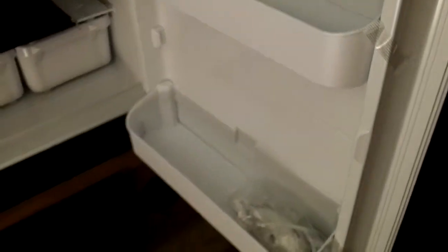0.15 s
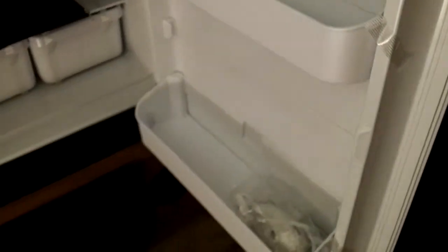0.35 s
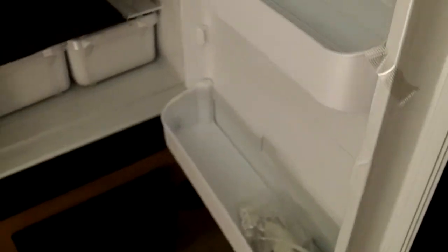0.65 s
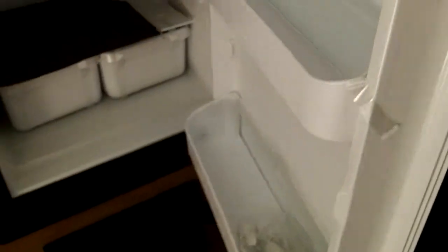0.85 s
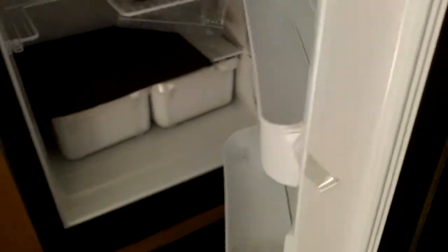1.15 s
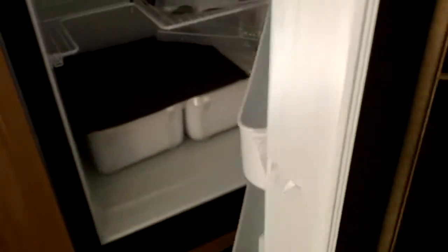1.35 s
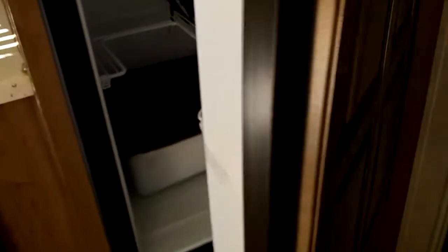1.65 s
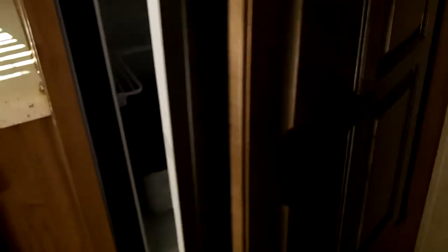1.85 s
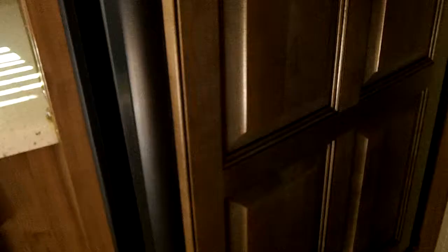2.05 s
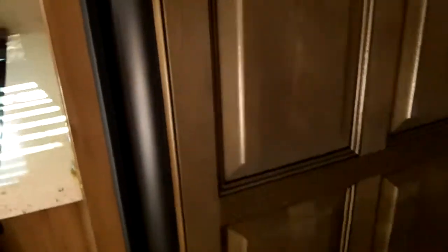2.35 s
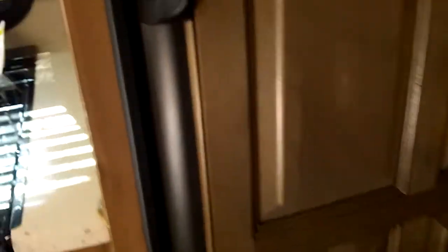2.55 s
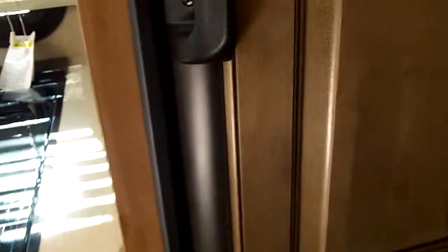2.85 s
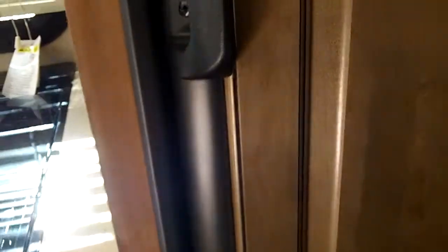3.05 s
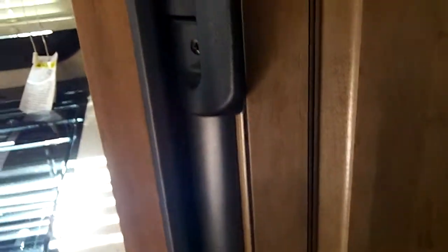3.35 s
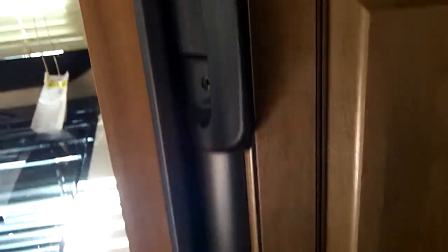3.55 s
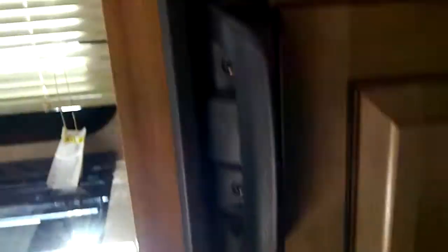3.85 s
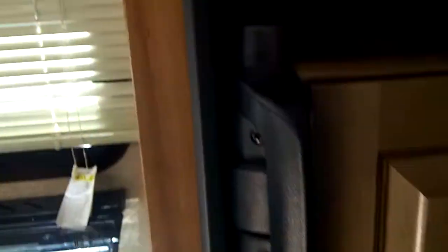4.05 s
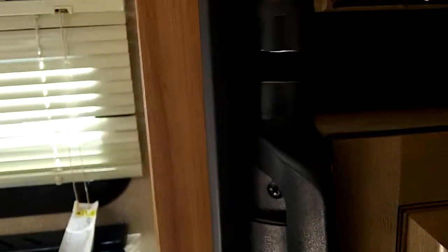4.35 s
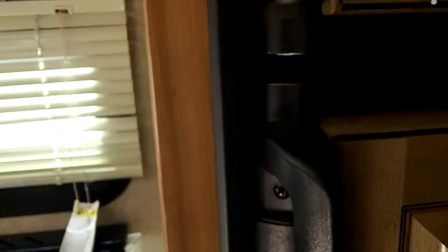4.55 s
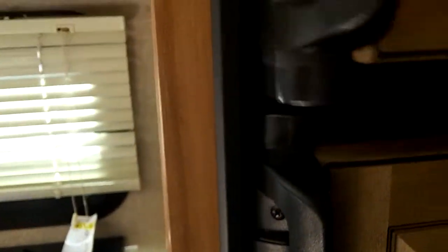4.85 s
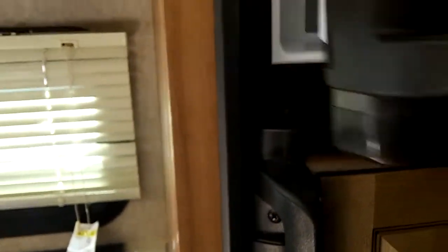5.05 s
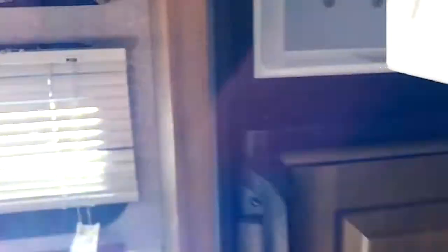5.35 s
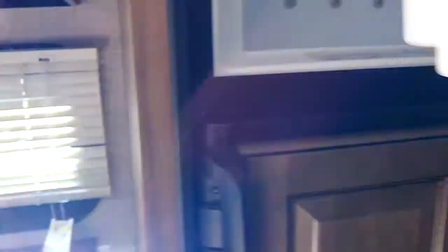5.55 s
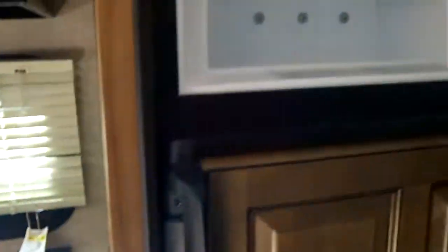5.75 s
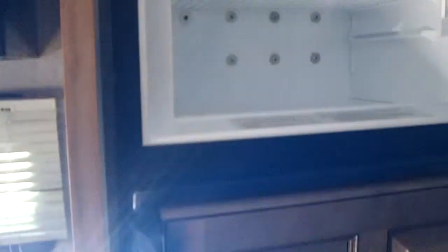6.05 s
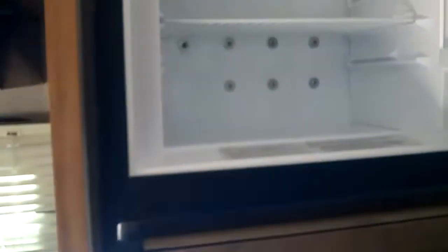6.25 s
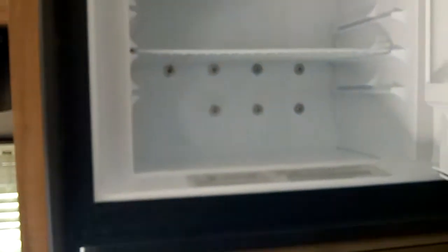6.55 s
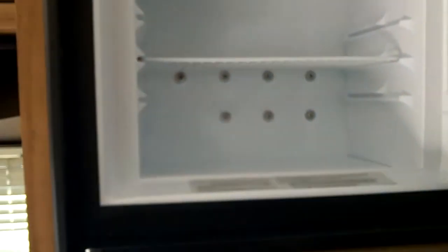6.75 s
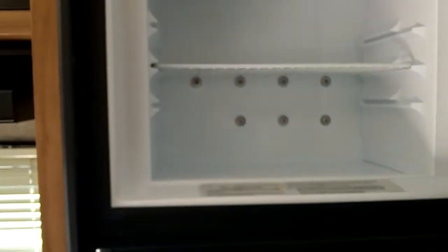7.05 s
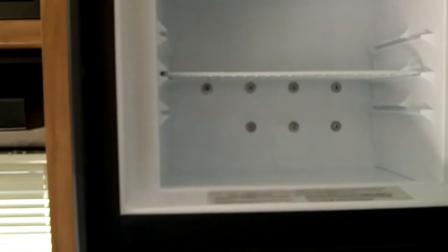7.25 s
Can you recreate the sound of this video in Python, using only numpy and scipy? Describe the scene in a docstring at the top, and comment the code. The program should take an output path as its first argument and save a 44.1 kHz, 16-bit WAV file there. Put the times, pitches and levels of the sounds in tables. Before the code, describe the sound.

In a small trailer, a refrigerator door knocks, slaps shut and latches with a loud snap, then handle clicks and dull hollow taps follow.

```python
"""Low room tone, faint drone and fine hiss (shaped noise); then a refrigerator door shuts in a small trailer.
Shelf and latch ramp knock, gasket rubs and slaps home, latch snaps: clicks, damped modes, dying noise.
A hand slides on the freezer handle, catches click, the seal peels (sparse slips), the door meets its stop.
Last, dull taps repeat like drips on a plastic tray: soft clicks with early echoes and hollow modes."""
import sys
import numpy as np
from scipy import signal
from scipy.fft import rfft, irfft
from scipy.io import wavfile
from scipy.ndimage import uniform_filter1d

SR = 44100
rng = np.random.default_rng(int(sys.argv[2]) if len(sys.argv) > 2 else 0)


def waveform_to_disk(signal):
    """Save audio, clipped to [-1, 1], as 16-bit WAV at the path in sys.argv[1]."""
    frames = np.transpose(np.atleast_2d(signal))
    scaled = np.clip(frames, -1, 1) * 32767
    samples = np.round(scaled).astype(np.int16)
    wavfile.write(sys.argv[1], SR, samples)


N = 327222

# Spectra, relative: (frequency [Hz], density [dB per Hz])
# steady room tone, drone, microphone hiss
AIR_COLOUR = [(12, -28.5), (20, 3), (91, -9.5), (114, -17), (178, -17.5), (259, -21.5), (300, -21),
              (494, -25.5), (559, -25), (753, -25), (812, -21), (1300, -24), (1940, -28), (5640, -37.5),
              (7600, -45.5), (9880, -74), (16700, -120)]
DRONE_COLOUR = [(150, -44.5), (200, -17.5), (220, 2.5), (242, -18), (320, -50.5), (2000, -76.5)]
HISS_COLOUR = [(7800, -24), (8500, -2), (9500, 0), (11500, -0.5), (15000, 0.5), (15500, -30.5)]
# shudder of doors and contents, hand on handle, gasket rub, gasket squeak
SHUDDER_COLOUR = [(30, -0.5), (90, 3.5), (200, -2.5), (400, -9.5), (750, -11.5), (1400, -13.5),
                  (2500, -21.5), (6000, -41.5), (10000, -70)]
HAND_COLOUR = [(1500, -24.5), (2100, -12.5), (2400, 4), (3000, -10.5), (4200, -9.5), (5400, -15.5),
               (6500, -11.5), (7500, -33), (10000, -50.5)]
GASKET_COLOUR = [(80, -4.5), (160, 6.5), (300, -3.5), (470, -10), (660, 2.5), (900, -6), (1400, -1),
                 (2300, -6), (3800, -7.5), (5500, -13), (6700, -19), (8000, -35.5), (12000, -60.5)]
SQUEAK_COLOUR = [(500, -30.5), (1300, -9.5), (2600, -16), (3300, -8), (3700, 1), (4200, -7), (4900, -40.5)]
# freezer door on its stop, tap on the tray
BUMP_COLOUR = [(35, -2), (65, 2), (120, -3.5), (170, -9), (270, -5), (450, -16.5), (900, -28.5),
               (2500, -33), (7000, -49), (10000, -69)]
TAP_COLOUR = [(120, -20.5), (300, 4.5), (500, 2.5), (800, 1.5), (1100, -7.5), (1550, -4), (2100, -10),
              (3500, -17), (6000, -31.5), (8000, -42)]
# door shelf knock, door liner after it, latch ramp
BIN_COLOUR = [(150, -32), (250, -12), (380, -14.5), (560, -9), (850, -15.5), (1060, -7.5), (1240, -25),
              (1650, -8), (1950, -13), (2450, 1), (3100, -9), (3700, -6.5), (6300, -14), (7600, -26),
              (9500, -33.5), (12000, -56.5), (16000, -60.5)]
LINER_COLOUR = [(150, -14), (300, -6.5), (550, 8.5), (900, -0.5), (1700, -6.5), (2450, -5.5), (3300, -2.5),
                (5500, -9.5), (7000, -11), (8500, -30.5), (16000, -60.5)]
STRIKER_COLOUR = [(71, -41.5), (120, -16.5), (547, -1.5), (891, -5.5), (1280, -5), (1400, -4.5),
                  (1870, -4.5), (2200, -7.5), (2630, -2.5), (6050, -18.5), (7380, -29.5), (7930, -51),
                  (9000, -49), (11700, -75.5), (19800, -120)]
# gasket slap, cabinet and shelves rustling after it
SLAP_COLOUR = [(100, -4.5), (300, 6.5), (600, -4), (1200, 1.5), (2500, -4.5), (4500, 3), (6700, -0.5),
               (8000, -11), (10000, -24), (12000, -46.5), (16000, -56.5)]
SHELF_COLOUR = [(100, 1.5), (300, 5), (600, -0.5), (1200, 2), (2500, -5.5), (4000, -4), (5200, 1),
                (6800, -1.5), (7700, -22), (9000, -42), (16000, -70)]
# latch bounces, its first and brightest strike, door panel rattling after the snap
LATCH_COLOUR = [(80, -8), (500, -24), (850, -17), (1300, 0), (2100, -15), (2900, -4), (3600, 2),
                (4600, -11.5), (6000, -7), (7100, -19), (7900, -31), (11000, -35), (16500, -51.5)]
STRIKE_COLOUR = [(80, -11.5), (500, -19.5), (850, -17.5), (1300, -6), (2100, -11.5), (2900, -7), (3600, -3),
                 (4600, -7.5), (5900, -2.5), (7000, -9), (7900, -24), (12500, -19.5), (16500, -27)]
PANEL_COLOUR = [(100, -13), (230, 1.5), (400, -6.5), (700, -11.5), (1200, -2.5), (2100, -3), (3000, 2),
                (4500, -5), (6200, -13.5), (7300, -21.5), (8500, -44.5), (16000, -65.5)]

# Modes of shelf, latch, hollow door, tray:
# (frequency [Hz], level [dB], t60 before division by the damping factor [s])
BIN_MODES = [(248.6, -13, 0.18), (335, -16, 0.124), (487.4, -8.5, 0.115), (562.3, -1, 0.103),
             (1103, -8.5, 0.067), (1373, -12, 0.102), (2463, -11, .09), (2610, -6, 0.08)]
LATCH_MODES = [(1220, -27, 0.16), (1905, -22, 0.11), (2307, -17.5, 0.069), (2612, -14.5, 0.06),
               (2826, -26.5, 0.19), (3483, -5.5, 0.045), (3580, -26.5, 0.14), (3559, -1, 0.023),
               (4520, -23.5, 0.078), (4360, -31, 0.17), (4855, -23.5, 0.088), (5346, -31.5, 0.1),
               (5750, -24.5, 0.039), (6100, -24.5, 0.096)]
DOOR_MODES = [(175, -8.5, 0.35), (203.2, -5.5, .42), (230, 0, .24), (346, -11, .25)]
TRAY_MODES = [(268.1, -3, 0.198), (342.7, 8, 0.101), (446.2, -3.5, 0.09), (539.5, -12, 0.18),
              (682.7, -5.5, 0.14), (890, 1.5, 0.0291), (1446, -8.5, 0.086), (1856, -4, 0.049),
              (2170, -14.5, 0.0583)]

# Contacts of shelf, latch ramp, latch bolt, freezer door stop, tray: (time [s], level [dB])
BIN_KNOCKS = [(1.4735, -14), (1.4748, 0.5), (1.4825, -10.5)]
STRIKER_CHATTER = [(2.2344, -1.5), (2.2375, 1), (2.2401, -19.5), (2.2469, -17)]
LATCH_BOUNCES = [(3.2295, -1.5), (3.2303, -13.5), (3.2339, -10.5), (3.2344, -3)]
BUMPS = [(6.098, -3), (6.110, 0)]
TAPS = [(6.4516, -1.5), (6.612, -1), (6.8146, 0), (7.0801, -1), (7.218, -8.5), (7.3174, -1.5)]
# Tap contact and its wall echoes: (delay [s], level [dB])
TAP_ECHOES = [(0, -23), (.003, -24), (.0064, -31)]
# Handle and catch clicks: (time [s], level [dB], centre [Hz], t60 [s])
CLICKS = [(1.584, -50.5, 1100, 0.256), (1.594, -49, 2420, 0.162), (2.491, -46, 2900, 0.046),
          (2.845, -48.5, 2100, 0.06), (2.899, -38.5, 3096, 0.0446), (3.540, -40.5, 1920, 0.0284),
          (4.188, -43, 3280, 0.0175), (4.219, -34.5, 3365, 0.0159), (4.317, -43.5, 1500, 0.0254),
          (4.364, -24, 3960, 0.0111), (4.366, -38, 1616, 0.052), (4.373, -40, 4150, 0.035),
          (4.538, -44, 1256, 0.078), (4.633, -38, 3800, .02), (4.638, -38, 3580, 0.018),
          (4.641, -40.5, 645, 0.056), (4.722, -35.5, 1400, 0.035), (4.748, -30.5, 700, 0.0342),
          (4.787, -32.5, 2200, 0.013), (5.164, -44.5, 2990, 0.022), (5.680, -53.5, 3800, 0.139),
          (7.175, -57.5, 3280, 0.24), (7.217, -44.5, 3900, 0.0592)]
# Door, cabinet and floor thuds:
# (time [s], level [dB], frequency [Hz], t60 before division by the damping factor [s])
THUDS = [(2.187, -40, 64.5, 0.15), (2.239, -46.5, 213, 0.336), (2.843, -31, 53.6, 0.105),
         (2.972, -34.5, 84.5, 0.23), (2.974, -37, 210, 0.28), (4.40, -48.5, 150.1, 0.26),
         (4.78, -26, 44.5, 0.156), (4.96, -38, 38, 0.22), (6.097, -41, 64.8, 0.207)]

# Swells of drone, shudder, gasket rub or peel, squeak:
# (peak time [s], peak level [dB], 60 dB rise [s], 60 dB fall [s])
DRONE = (3, -65.5, 14, 6)
SHUDDER = [(2.25, -50, 0.01, 1.0), (2.5, -58, 0.64, 0.6), (2.975, -33.5, 0.2486, 0.3341),
           (3.25, -56.5, 0.47, 1.73), (4.42, -54.5, 1.85, 1.33), (4.97, -52.5, 1.14, 1.01)]
GASKET = [(2.195, -52, 0.11, 0.08), (2.93, -50.5, 0.13, 0.14), (4.64, -56, 0.18, 0.47),
          (4.755, -45.5, 0.2578, 0.1025), (4.785, -41, 0.1425, 0.1441)]
SQUEAK = (2.966, -46, 0.2159, 0.0946)
# Hand strokes: (middle time [s], peak level [dB], half length [s])
HAND = [(3.853, -60, 0.0362), (4.075, -59.5, 0.118)]
# Trailer reverberation: (frequency [Hz], t60 [s])
ROOM = [(150, 0.337), (600, 0.43), (1500, 0.18), (3500, 0.3), (6500, 0.16), (9000, 0.074)]

AIR_DB, HISS_DB = -54.5, -74.0
STICK_S, STICK_DB = .006, 1.56  # stick-slip unevenness: smoothing length, rms spread
SLIPS_PER_S = 9000
BAND_EDGE_HZ = 16800


def amp(db):
    """Decibels to gain."""
    return 10 ** (np.asarray(db) / 20)


def evened(x):
    """Scales to rms 1."""
    return x / np.sqrt(np.mean(x ** 2) + 1e-20)


def read(points, hz):
    """Interpolates a table on a logarithmic frequency axis."""
    table_hz, value = np.transpose(points)
    return np.interp(np.log(hz + 1), np.log(table_hz + 1), value)


def add(mix, time_s, sound):
    """Mixes a sound in at time_s."""
    part = mix[round(time_s * SR):][:len(sound)]
    part += sound[:len(part)]


def ring_time():
    """Half a second of sample times."""
    return np.arange(SR // 2) / SR


def tinted(x, colour):
    """Gives a long signal a spectrum, at rms 1."""
    gain = amp(read(colour, np.fft.rfftfreq(len(x), 1 / SR)))
    return evened(irfft(rfft(x) * gain, len(x)))


def tinted_noise(colour):
    """Steady noise of a given spectrum, at rms 1."""
    return tinted(rng.standard_normal(N), colour)


def swell(peak_s, level_db, rise_s, fall_s):
    """Gain that rises linearly in decibels to its peak, then falls likewise."""
    age_s = np.arange(N) / SR - peak_s
    drop_db = 60 * np.maximum(-age_s / rise_s, age_s / fall_s)
    return amp(level_db - np.minimum(drop_db, 200))


def stroke(middle_s, level_db, half_s):
    """Bell-shaped gain of a sliding hand that speeds up and slows down."""
    away = (np.arange(N) / SR - middle_s) / half_s
    return amp(level_db) * np.exp(-np.minimum(away ** 2, 20))


def crack(colour, size=2048):
    """Minimum-phase click of unit energy with a given spectrum."""
    log_gain = np.log(amp(read(colour, abs(np.fft.fftfreq(size, 1 / SR)))))
    click = np.fft.ifft(np.exp(np.conj(signal.hilbert(log_gain)))).real
    click *= signal.windows.hann(2 * size)[size:]
    return click / np.linalg.norm(click)


def scatter(t60_s):
    """Dying swarm of reflections inside a panel, of unit energy."""
    t = ring_time()
    swarm = rng.standard_normal(len(t)) * amp(-60 * t / t60_s)
    return swarm / np.linalg.norm(swarm)


def blow(colour, crack_db, body_db, t60_s):
    """Contact click with the dense ring of the struck panel."""
    drive = amp(body_db) * scatter(t60_s)
    drive[0] += amp(crack_db)
    return signal.fftconvolve(drive, crack(colour))[:len(drive)]


def ring(modes, damping):
    """Damped sine modes of alternating sign; damping divides each t60."""
    t = ring_time()
    out = np.zeros(len(t))
    for k, (hz, level_db, t60_s) in enumerate(modes):
        decay = amp(level_db - 60 * damping * t / t60_s)
        out += (-1) ** k * decay * np.sin(2 * np.pi * hz * t)
    return out


def played(rows, sound):
    """Repeats one sound at each (time, level) row."""
    out = np.zeros(N)
    for time_s, level_db in rows:
        add(out, time_s, amp(level_db) * sound)
    return out


def in_room(x, wet_db):
    """Adds the trailer's short noise tail, whose decay time varies with frequency."""
    t = ring_time()
    hz, age_s, bands = signal.stft(rng.standard_normal(len(t)), SR, nperseg=256)
    decay = amp(-60 * age_s / read(ROOM, hz)[:, None])
    tail = signal.istft(bands * decay, SR, nperseg=256)[1][:len(t)]
    tail *= np.clip((t - .002) / .005, 0, 1)  # onset after 2 ms
    return x + amp(wet_db) * signal.fftconvolve(x, tail / np.linalg.norm(tail))[:N]


def background():
    """Shaped noises: low room tone, faint swelling drone, microphone hiss."""
    air = amp(AIR_DB) * tinted_noise(AIR_COLOUR)
    drone = swell(*DRONE) * tinted_noise(DRONE_COLOUR)
    hiss = amp(HISS_DB) * tinted_noise(HISS_COLOUR)
    return air + drone + hiss


def shudder():
    """Jolts and pulls shake the doors and their contents: swelling low noise."""
    return sum(swell(*jolt) for jolt in SHUDDER) * tinted_noise(SHUDDER_COLOUR)


def thuds():
    """Heavy panels swing as low damped sines with a soft onset."""
    out, t = np.zeros(N), ring_time()
    onset = 1 - np.exp(-t / 0.0047)
    for time_s, level_db, hz, t60_s in THUDS:
        add(out, time_s, ring([(hz, level_db, t60_s)], damping=0.91) * onset)
    return in_room(out, wet_db=-13.5)


def hand():
    """Skin slides along the handle as smooth noise."""
    return sum(stroke(*slide) for slide in HAND) * tinted_noise(HAND_COLOUR)


def bump():
    """The freezer door swings softly against its stop in two contacts."""
    return played(BUMPS, blow(BUMP_COLOUR, crack_db=-21, body_db=-16.0, t60_s=0.167))


def taps():
    """Taps on one spot of a hollow tray excite its modes; near walls echo within milliseconds."""
    out = np.zeros(N)
    contact = crack(TAP_COLOUR)
    hollow = ring(TRAY_MODES, damping=1.0) * amp(-47)
    hollow += blow(TAP_COLOUR, crack_db=-43.5, body_db=-26.0, t60_s=0.216)
    hollow += ring([(140.1, -50, 0.108)], damping=0.96)  # low thump of the whole tray
    for time_s, level_db in TAPS:
        for delay_s, echo_db in TAP_ECHOES:
            add(out, time_s + delay_s, amp(level_db + echo_db) * contact)
        fresh = blow(TAP_COLOUR, crack_db=-43.5, body_db=-17.0, t60_s=0.212)  # varies per tap
        add(out, time_s, amp(level_db) * (hollow + fresh))
    return in_room(out, wet_db=-16.5)


def clicks():
    """Light plastic contacts, each with one broad resonance and little above 7 kHz."""
    out = np.zeros(N)
    for time_s, level_db, hz, t60_s in CLICKS:
        colour = [(hz / 12, -20), (hz / 2, -9), (hz, 0), (hz * 1.3, -10), (hz * 1.82, -13),
                  (hz * 2.36 + 2500, -27), (hz * 3 + 7000, -50)]
        click = blow(colour, crack_db=-11.0, body_db=-5.0, t60_s=t60_s)
        energy_gain = np.sqrt(SR * t60_s / np.log(1e6))  # longer rings carry more energy
        add(out, time_s, amp(level_db) * energy_gain * click)
    soft = signal.sosfilt(signal.butter(8, 7300, fs=SR, output="sos"), out)
    return in_room(soft, wet_db=-15.5)


def gasket():
    """Rubber sticks and slips unevenly: sparse random impulses, coloured as rub and squeak."""
    slips = rng.standard_normal(N)
    slips *= amp(2.5 * np.minimum(rng.exponential(1, N), 3))
    slips *= rng.random(N) < SLIPS_PER_S / SR
    grip = evened(uniform_filter1d(rng.standard_normal(N), max(round(STICK_S * SR), 1)))
    slips *= amp(STICK_DB * grip)
    rubs = sum(swell(*rub) for rub in GASKET) * tinted(slips, GASKET_COLOUR)
    squeak = swell(*SQUEAK) * tinted(slips, SQUEAK_COLOUR)
    return in_room(rubs + squeak, wet_db=-13.0)


def door_bin():
    """A plastic shelf knocks in the swinging door, touches again and stirs the liner."""
    main_s = BIN_KNOCKS[1][0]
    knocks = played(BIN_KNOCKS, blow(BIN_COLOUR, crack_db=-5.5, body_db=-5, t60_s=0.01))
    add(knocks, main_s, amp(-36) * ring(BIN_MODES, damping=0.8))
    add(knocks, main_s, blow(LINER_COLOUR, crack_db=-35, body_db=-12.5, t60_s=0.217))
    return in_room(knocks, wet_db=-18.5)


def striker():
    """The latch bolt meets its ramp and chatters; the door panel answers."""
    out = np.zeros(N)
    for time_s, level_db in STRIKER_CHATTER:
        add(out, time_s, amp(level_db) * blow(STRIKER_COLOUR, crack_db=-13, body_db=-5, t60_s=0.0444))
    add(out, STRIKER_CHATTER[0][0], blow(STRIKER_COLOUR, crack_db=-25, body_db=-5.5, t60_s=0.189))
    return in_room(out, wet_db=-23.0)


def slap():
    """Trapped air is squeezed until the gasket seals with a slap; the door rebounds at 19 Hz."""
    out, t, seal_s = np.zeros(N), ring_time(), 2.9712
    squeeze = amp(-15.5) * np.exp(-t / 0.00273)[::-1]
    rebound = -amp(-18.5) * np.exp(-t / 0.0098) * np.cos(2 * np.pi * 19 * t)
    soft_rubber = signal.butter(2, 3000, fs=SR, output="sos")  # rounds the edge
    push = signal.sosfilt(soft_rubber, np.concatenate([squeeze, rebound]))
    add(out, seal_s - len(t) / SR, push)
    add(out, seal_s, amp(2.0) * crack(SLAP_COLOUR))
    add(out, seal_s, blow(SHELF_COLOUR, crack_db=-30, body_db=-8.5, t60_s=.22))
    return out


def latch():
    """The sprung bolt snaps into its keeper, bounces, rings the handle and booms the hollow door."""
    strike_s = 3.2285
    snap = played(LATCH_BOUNCES, blow(LATCH_COLOUR, crack_db=7.0, body_db=1, t60_s=.017))
    add(snap, strike_s, blow(STRIKE_COLOUR, crack_db=4.5, body_db=2, t60_s=.012))
    add(snap, strike_s, amp(-14) * ring(LATCH_MODES, damping=1.1))
    add(snap, strike_s, amp(-39.0) * ring(DOOR_MODES, damping=0.863))
    add(snap, strike_s, blow(PANEL_COLOUR, crack_db=-14, body_db=-4.5, t60_s=.45))
    add(snap, LATCH_BOUNCES[2][0], blow(PANEL_COLOUR, crack_db=-10.5, body_db=0, t60_s=0.067))
    return in_room(snap, wet_db=-31)


def scene():
    """All sources at one microphone."""
    closing = door_bin() + striker() + slap() + latch()
    handling = clicks() + thuds() + gasket() + hand() + shudder() + bump()
    return (closing + handling + taps() + background())[None]


def record(dry):
    """The microphone rounds the hardest peaks, dips narrowly at 7.9 kHz and is band-limited."""
    rounded = dry / (1 + (dry / .85) ** 6) ** (1 / 6)
    dipped = signal.lfilter(*signal.iirnotch(7900, 7, SR), rounded)
    low_pass = signal.firwin(511, BAND_EDGE_HZ, window=("kaiser", 9), fs=SR)
    return signal.oaconvolve(dipped, low_pass[None], "same")


dry = scene()
out = record(dry)
waveform_to_disk(out)
```